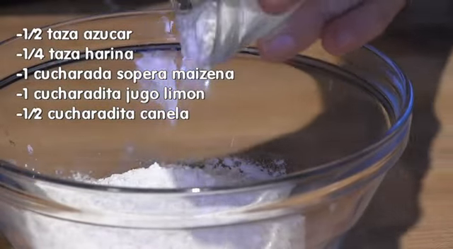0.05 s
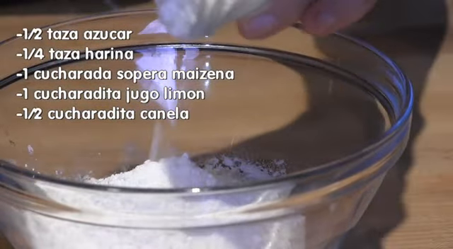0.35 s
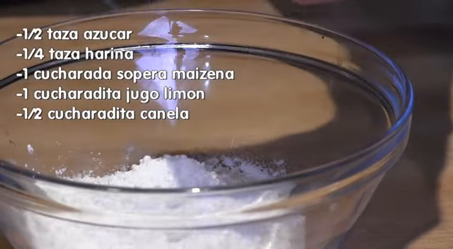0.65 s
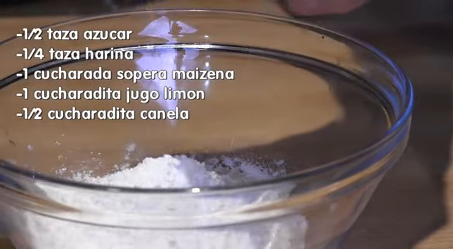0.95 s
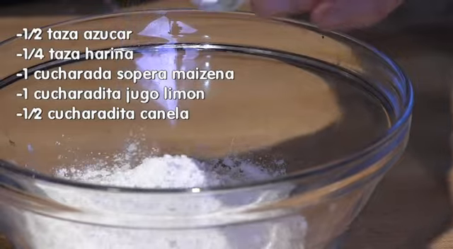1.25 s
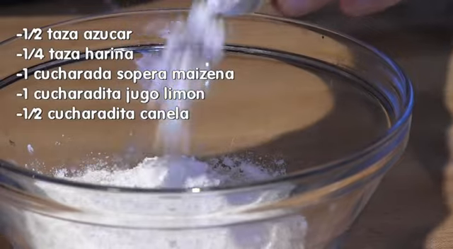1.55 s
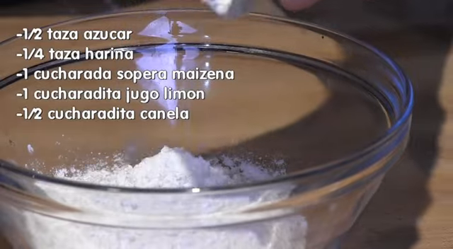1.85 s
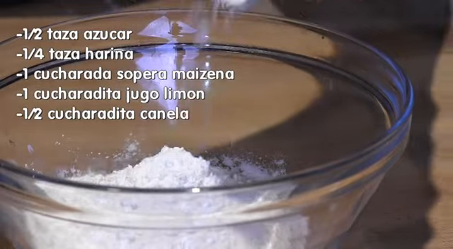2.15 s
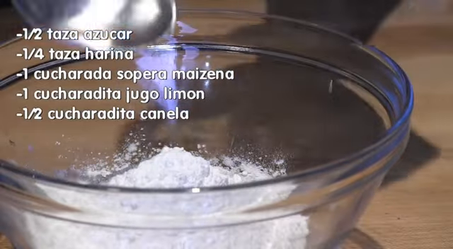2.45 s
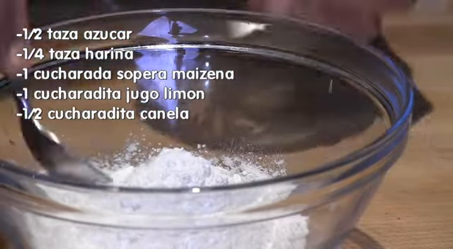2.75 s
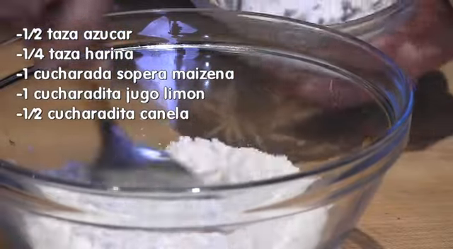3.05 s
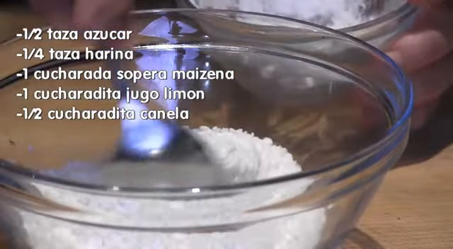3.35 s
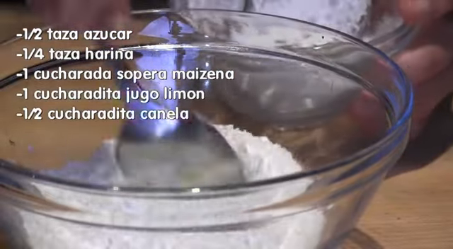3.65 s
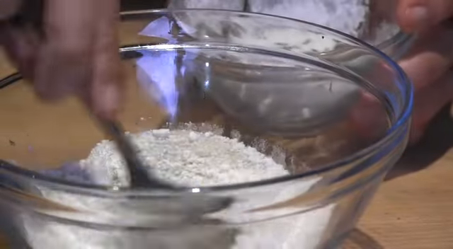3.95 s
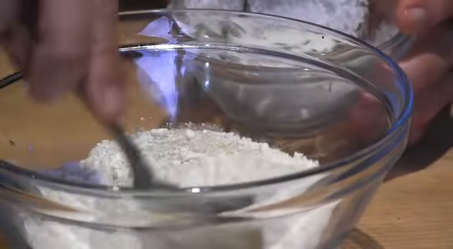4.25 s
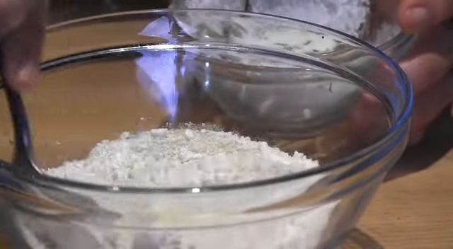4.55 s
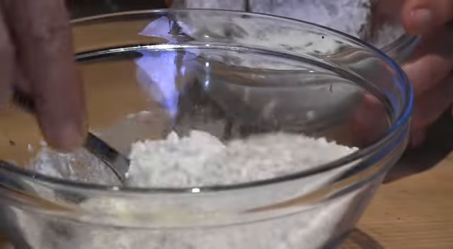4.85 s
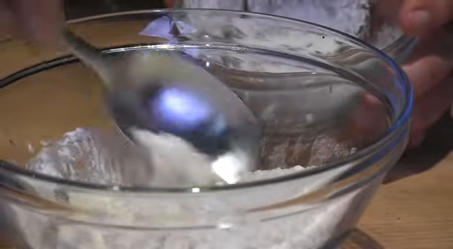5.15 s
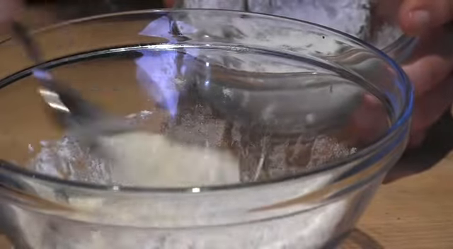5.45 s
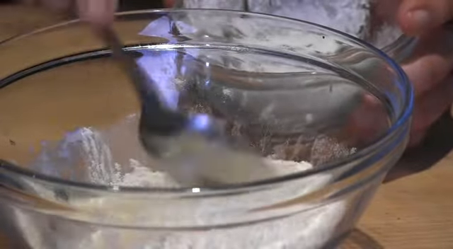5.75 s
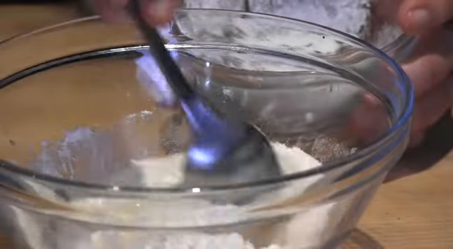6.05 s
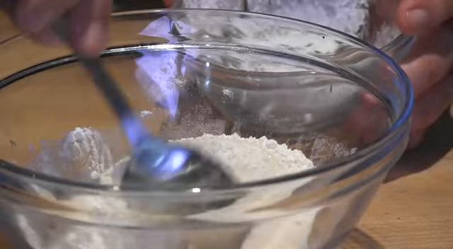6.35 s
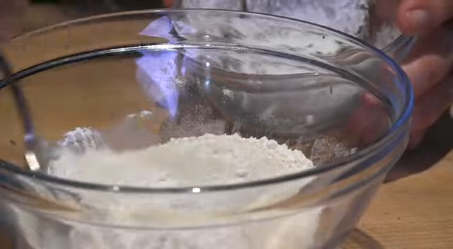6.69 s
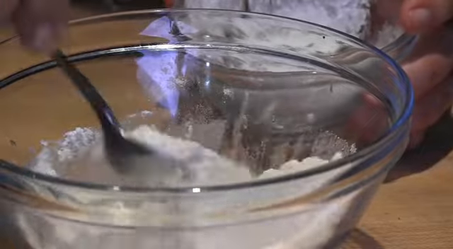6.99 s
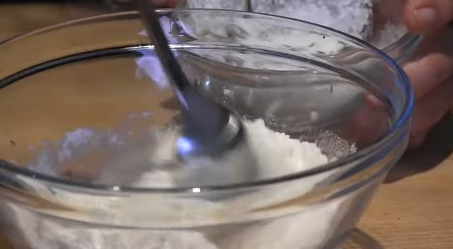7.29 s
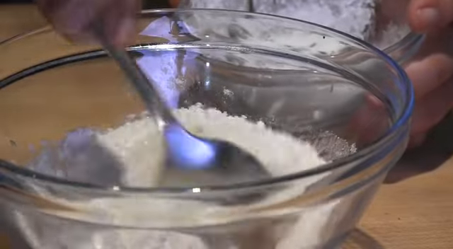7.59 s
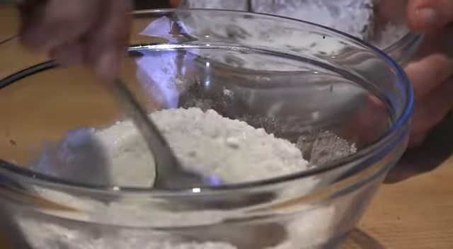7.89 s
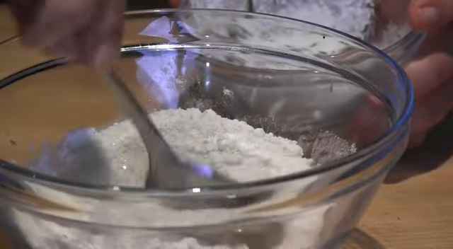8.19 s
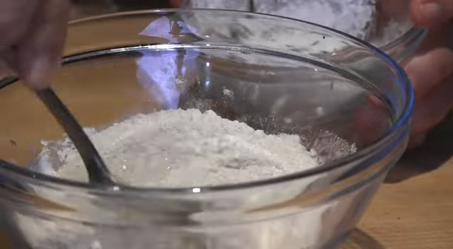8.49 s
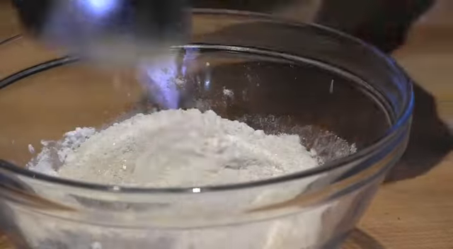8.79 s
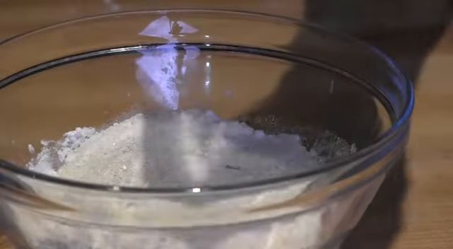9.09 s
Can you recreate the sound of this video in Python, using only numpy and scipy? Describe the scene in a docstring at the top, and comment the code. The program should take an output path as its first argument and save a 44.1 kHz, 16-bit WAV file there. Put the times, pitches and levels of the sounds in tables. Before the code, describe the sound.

Close to the microphone, a metal cup taps sharply on the rim of a glass bowl about four times a second, ringing more as it empties. A steel spoon then rasps softly through dry flour and sugar, with small ticks, damped knocks and three bright clinks on the glass. It ends with a brief rattle against the cup. A faint appliance hum fills the small kitchen.

```python
"""A metal cup taps on the rim of a glass bowl, close to the microphone, ringing more as the flour shakes out.
Then a steel spoon rasps through the dry mix, its tip catching and slipping on the grains. It knocks on the
covered glass, clinks three times on the bare wall, and rattles against the cup as it is laid aside.
Each blow is a short crack plus ringing modes. A small hard kitchen answers, with a faint appliance hum
behind it all, and the loud blows overload the microphone."""
import sys
import numpy as np
from scipy import signal
from scipy.fft import rfft, irfft
from scipy.io import wavfile

SR = 44100
rng = np.random.default_rng(int(sys.argv[2]) if len(sys.argv) > 2 else 0)


def transcribe(signal):
    """Save signal, clipped to [-1, 1], as a 16-bit WAV file at the path in sys.argv[1]."""
    frames = np.atleast_2d(signal).T
    limited = np.clip(frames, -1, 1)
    pcm = np.round(limited * 32767).astype(np.int16)
    wavfile.write(sys.argv[1], SR, pcm)


N = 411453

# Cup on the rim, with rebounds; spoon against the cup: (time [s], level [dB], favoured pitch [Hz])
RIM_TAPS = [(-.06, -2, 5450), (.1495, -12, 1660), (.2163, -22.5, 1330), (.4159, -9.5, 1320),
            (.658, -6, 1330), (.922, -7.5, 2040), (.9608, -14.5, 3960), (1.132, -10.5, 1510),
            (1.149, -23.5, 1320), (1.4093, -6, 1430), (1.659, -4.5, 1850), (1.9233, -5, 4040),
            (2.1652, -6.5, 7600)]
SPOON_RATTLE = [(9.208, -19, 1750), (9.2671, -17, 4900), (9.301, -23, 1330)]
# Ring of the cup: (frequency [Hz], energy share [dB], t60 [s])
CUP_MODES = [(1310, -10, .08), (1365, -14, .1), (1665, -13, .1), (1712, -9, .2), (3222, -10, .16),
             (3596, -6, .11), (3648, -1, .14), (4759, -16, .25), (6285, -9, .17), (6860, -10, .07),
             (7745, -14, .27), (7812, -14, .12), (1170, -15, .08), (2040, -14, .04), (4945, -12, .06),
             (6030, -15, .1), (9410, -10, .025), (12560, -14, .04)]
# Its crack of contact, a blur of short-lived modes: (frequency [Hz], relative density [dB])
CUP_CRACK_SPECTRUM = [(60, -23.5), (650, -6.5), (1300, 5.5), (2500, 3), (3500, 1.5), (4900, 4), (7200, -1),
                      (7900, 0), (9500, 0.5), (10300, -15.5), (11800, -13), (12600, -4), (14200, -13.5),
                      (15500, -9.5)]

def metal_cup(room, full_ring_db=-12, empty_ring_db=-1.5, empty_s=1.8):
    """Flour damps the cup, so it rings more freely as it empties; at the end the spoon rattles on it."""
    emptied = np.clip(np.transpose(RIM_TAPS)[0] / empty_s, 0, 1) ** 2
    ring_db = full_ring_db + (empty_ring_db - full_ring_db) * emptied
    taps = struck(RIM_TAPS, ring_db, tilt_db=-0.55, hardening=0.19)
    rattle = struck(SPOON_RATTLE, ring_db=-9, tilt_db=-1.6, hardening=0.27)
    return blows(np.vstack([taps, rattle]), CUP_MODES, CUP_CRACK_SPECTRUM, room,
                 crack_t60=0.028, modes_db=0.5, favour_db=10.5, favour_octaves=0.16)


# Spoon on covered glass: (time [s], level [dB], brightness [dB/octave])
COVERED_KNOCKS = [(4.0057, -13.5, -1), (4.290, -14, -0.35), (5.683, -20.5, -2.3), (6.3833, -13, -1.6),
                  (7.6124, -7.5, -0.6), (7.9549, -28, -4.5), (8.5214, -11, 0.5)]
# Ring of the spoon: (frequency [Hz], energy share [dB], t60 [s])
SPOON_MODES = [(534, -16.5, 0.076), (677, -12, 0.057), (981, -17.5, 0.31), (1137, -8.5, 0.024),
               (1927, -10.5, 0.036), (2130, -25, 0.027), (2290, -35, 0.014), (3180, -21, 0.28),
               (3380, -9, 0.014), (4700, -17.5, 0.21), (4870, -36, 0.13), (7520, -13.5, 0.024),
               (8050, -21, 0.032), (9340, -12, 0.02), (9790, -19, 0.043), (10860, -11.5, 0.036)]
# Its crack of contact: (frequency [Hz], relative density [dB])
SPOON_CRACK_SPECTRUM = [(60, -31), (380, -6), (1000, -1.5), (1500, -3.5), (2100, -1), (2900, -6),
                        (3400, -5.5), (4900, 1.5), (6900, -15.5), (8000, -5.5), (9400, -5), (10200, -21),
                        (13700, -12), (14400, -20)]

def spoon_knocks(room, ring_db=-5, favoured_hz=1900):
    """Steel meets glass through a layer of powder, which damps every knock alike."""
    knocks = [(s, db, tilt_db, ring_db, favoured_hz) for s, db, tilt_db in COVERED_KNOCKS]
    return blows(knocks, SPOON_MODES, SPOON_CRACK_SPECTRUM, room,
                 crack_t60=0.03, modes_db=5.5, favour_db=-0.3, favour_octaves=0.12)


# Spoon on bare glass: (time [s], level [dB], brightness [dB/octave], ring [dB], favoured pitch [Hz])
WALL_CLINKS = [(5.2228, -5.5, 0.9, -9.5, 9300), (5.6086, -16, -1.85, 11, 4330),
               (6.0027, -14, 0, -2.5, 3030)]
# Ring of the bowl: (frequency [Hz], energy share [dB], t60 [s])
BOWL_MODES = [(1631, -2, .34), (2948, -5, .42), (4589, 0, .3), (6546, -9, .22), (8755, -5, .18),
              (10275, -11, .15), (6000, -11, .03), (9070, -13, .13), (12110, -17, .12)]
# Its crack of contact: (frequency [Hz], relative density [dB])
BOWL_CRACK_SPECTRUM = [(60, -10.5), (590, -1), (690, 11.5), (800, -3), (1900, 0), (2400, 3), (4500, -3),
                       (6300, 5), (7900, -4), (8700, 1), (10400, 5), (11300, -5), (16000, -8)]

def bowl_clinks(room):
    """The spoon strikes the bare wall and sets the glass ringing."""
    return blows(WALL_CLINKS, BOWL_MODES, BOWL_CRACK_SPECTRUM, room,
                 crack_t60=0.044, modes_db=-4, favour_db=10, favour_octaves=0.33)


# Slips of the spoon's tip: (time [s], level [dB], favoured pitch [Hz])
TIP_SLIPS = [(2.9767, -25, 9700), (3.2541, -36, 9700), (3.3195, -40, 9700), (3.539, -40, 4950),
             (3.6553, -37.5, 11350), (4.6823, -38, 8450), (4.703, -33.5, 5000), (4.7846, -31.5, 2280),
             (6.596, -37, 5030), (6.6593, -29, 5100), (6.7282, -36.5, 5200), (6.826, -31, 1320)]
# Ring of the tip: (frequency [Hz], energy share [dB], t60 [s])
TIP_MODES = [(1307, -6, 0.046), (2230, -8.5, 0.055), (3384, -9.5, 0.028), (4860, -12, 0.026),
             (4960, -18.5, 0.16), (6130, -12, 0.028), (7980, -15.5, .015), (8200, -13, 0.033),
             (9740, -12.5, .04), (11230, -18, 0.16), (12200, -19, .008)]
# Rasp of grains under the tip: (frequency [Hz], relative density [dB])
RASP_SPECTRUM = [(200, -2), (800, 10.5), (5000, -0.5), (7000, -8.5), (9000, 0), (10400, -10), (13300, -7),
                 (14500, -14)]

def tip_slips(room):
    """The tip catches and slips with a small ringing tick."""
    slips = struck(TIP_SLIPS, ring_db=2, tilt_db=-0.04, hardening=0)
    return blows(slips, TIP_MODES, RASP_SPECTRUM, room,
                 crack_t60=0.045, modes_db=0.5, favour_db=6.5, favour_octaves=0.21)


# Sweeps of the spoon through the powder: (middle time [s], relative level [dB], half length [s])
SPOON_SWEEPS = [(3.62, -43, 0.047), (6.78, -40, 0.052), (7.27, -47.5, .06), (8.06, -45.5, 0.21),
                (8.253, -36.5, 0.023)]

def spoon_pressure(t, grind_lead_s=0.0045, grind_half_s=0.021, grind_db=-12.5):
    """Force of the spoon on the powder: long sweeps, and a short grind leading into each slip."""
    grinds = [(s - grind_lead_s, db + grind_db, grind_half_s) for s, db, _ in TIP_SLIPS]
    swells = SPOON_SWEEPS + grinds
    return np.sqrt(sum(amp(db) ** 2 * np.exp(-((t - s) / half) ** 2) for s, db, half in swells))


def stirring(room, grains_per_s=600, grain_spread_db=4.5, hiss_db=-6, ring_db=-4):
    """Sugar grains are crushed between steel and glass; each one rings the tip of the spoon."""
    t = np.arange(N) / SR
    sizes = amp(grain_spread_db * np.minimum(rng.exponential(1, N), 4)) * rng.choice([-1, 1], N)
    grains = sizes * (rng.random(N) < grains_per_s / SR)
    age = t[:SR // 4]
    tip = sum(amp(db) * unit(np.cos(2 * np.pi * hz * age) * amp(-60 * age / t60))
              for hz, db, t60 in TIP_MODES)
    hiss = amp(hiss_db) * unit(colour(grains, RASP_SPECTRUM))
    ring = amp(ring_db) * unit(signal.oaconvolve(grains, tip)[:N])
    return at_microphone(spoon_pressure(t) * (hiss + ring), room)


def struck(rows, ring_db, tilt_db, hardening):
    """A harder blow is a shorter contact, so brighter: hardening is dB/octave per dB over the mean."""
    s, db, favoured_hz = np.transpose(rows)
    brightness = tilt_db + hardening * (db - db.mean())
    return np.column_stack([s, db, brightness, ring_db + np.zeros(len(s)), favoured_hz])


def blows(rows, modes, spectrum, room, crack_t60, modes_db, favour_db, favour_octaves, spread_db=1):
    """Each blow is a short crack plus ringing modes, as mid and side."""
    t = np.arange(SR * 3 // 4) / SR
    hz, mode_db, _ = np.transpose(modes)
    octaves = np.log2(hz / 3000)
    waves = ringing(modes, room, t)
    cracks, rings = np.zeros(N), np.zeros((2, N))
    norm = np.sqrt(.01 * SR / len(t))  # levels count the energy as if it came within 10 ms
    for s, db, tilt_db, ring_db, favoured_hz in rows:
        burst = rng.standard_normal(len(t)) * amp(-60 * t / crack_t60)
        add(cracks, s, norm * amp(db) * unit(colour(burst, spectrum, tilt_db)))
        # modes that move most at the point of contact take most of the blow
        favour = favour_db * np.exp(-(np.log2(hz / favoured_hz) / favour_octaves) ** 2)
        shares = amp(mode_db + favour + tilt_db * octaves + spread_db * rng.standard_normal(len(hz)))
        phases = np.exp(2j * np.pi * rng.random(len(hz)))
        ring = np.tensordot(shares * phases, waves, 1).real
        for track, sound in zip(rings, ring):
            add(track, s, norm * amp(db + ring_db + modes_db) * sound)
    return at_microphone(cracks, room) + rings


def ringing(modes, room, t, side_db=-1):
    """Each mode beats with its own reflections: complex waves, modes x (mid, side) x time."""
    hz, _, t60 = np.transpose(modes)
    waves = np.exp(np.outer(2j * np.pi * hz - np.log(1000) / t60, t))
    waves = signal.fftconvolve(waves[:, None], room[None], axes=2)[..., :len(t)]
    waves /= waves.real.std(2, keepdims=True)
    waves[:, 1] *= amp(read(ROOM_WIDTH, hz) + side_db)[:, None]
    return waves


# Decay of the kitchen: (frequency [Hz], t60 [s])
ROOM_DECAY = [(150, .22), (500, .33), (1000, .38), (4000, .4), (8000, .35), (15000, .25)]
# Width of its reflections at the microphone: (frequency [Hz], side against mid [dB])
ROOM_WIDTH = [(200, -2.5), (1000, -2.5), (2500, -5.5), (5000, -8), (8000, -2), (13000, -15.5)]

def kitchen(wet_db=-1, early_db=4, early_t60=0.095, gap_s=0.00092):
    """Mid and side response near the bowl: direct sound, quick table and wall echoes, a short tail."""
    hz, t, noise = signal.stft(rng.standard_normal((2, SR * 3 // 4)), SR, nperseg=256)
    diffuse = amp(-60 * t / read(ROOM_DECAY, hz)[:, None])
    early = amp(early_db - 60 * t / early_t60)
    reflections = noise * (diffuse + early)
    reflections[1] *= amp(read(ROOM_WIDTH, hz))[:, None]
    tail = signal.istft(reflections, SR, nperseg=256)[1]
    tail *= 1 - np.exp(-(np.arange(tail.shape[1]) / SR / gap_s) ** 2)
    response = amp(wet_db) * tail / np.linalg.norm(tail[0])
    response[0, 0] += 1  # direct sound, dead centre
    return response


def at_microphone(x, room):
    """A dry sound as it reaches the close microphone, as mid and side."""
    return signal.oaconvolve(x[None], room, axes=1)[:, :N]


# Still air of the kitchen: (frequency [Hz], relative density [dB])
AIR_SPECTRUM = [(25, -7.5), (200, -7), (500, -7), (850, -4.5), (1300, -9), (1900, -11.5), (5400, -20.5),
                (8000, -26.5), (10500, -28.5), (12500, -25.5), (15500, -29)]
# Its width: (frequency [Hz], side against mid [dB])
AIR_WIDTH = [(60, 17), (130, 16), (290, 14), (640, 3.5), (1410, -3), (3100, -5), (6820, -3), (15000, -14.5)]
# Appliance hum and fan tones: (frequency [Hz], bandwidth [Hz], level [dB])
APPLIANCE_TONES = [(113, 1, -74.5), (240.2, 4.6, -52), (830, 3.4, -51.5), (954, 21, -60), (1885, 170, -54)]

def room_tone(air_db=-43, hum_side_db=-3):
    """Steady air, very wide in the bass, with the wavering tones of an appliance; left and right."""
    f = np.fft.rfftfreq(N, 1 / SR)
    air_gain = amp(read(AIR_SPECTRUM, f))
    air = np.array([shaped_noise(air_gain), shaped_noise(air_gain * amp(read(AIR_WIDTH, f)))])
    air *= amp(air_db) / air[0].std()
    hum_gain = sum(amp(db) * np.sqrt(SR / 2 / width) / (1 + (2 * (f - hz) / width) ** 2)
                   for hz, width, db in APPLIANCE_TONES)
    hum = np.array([shaped_noise(hum_gain), amp(hum_side_db) * shaped_noise(hum_gain)])
    mid, side = air + hum
    return np.array([mid + side, mid - side])


def amp(db):
    """Decibels to gain."""
    return 10 ** (np.asarray(db) / 20)


def unit(x):
    """Scales to an rms of 1."""
    return x / np.sqrt(np.mean(x ** 2) + 1e-20)


def read(points, hz):
    """Reads a table along a logarithmic frequency axis."""
    f, value = np.transpose(points)
    return np.interp(np.log(hz + 1), np.log(f + 1), value)


def add(mix, s, sound):
    """Adds a sound at time s, dropping what lies outside."""
    at = round(s * SR)
    sound = sound[max(-at, 0):]
    part = mix[max(at, 0):][:len(sound)]
    part += sound[:len(part)]


def shaped_noise(gain):
    """White noise weighted by a gain for each frequency."""
    return irfft(rfft(rng.standard_normal(N)) * gain, N)


def colour(x, points, tilt_db=0, size=2048):
    """Causal filter, so that attacks stay sharp; the tilt, in dB/octave, pivots at 3 kHz."""
    hz = abs(np.fft.fftfreq(size, 1 / SR))
    octaves = np.log2(np.maximum(hz, 300) / 3000)
    log_gain = np.log(amp(read(points, hz) + tilt_db * octaves))
    taps = np.fft.ifft(np.exp(np.conj(signal.hilbert(log_gain)))).real
    return signal.oaconvolve(x, taps[:size // 2])[:len(x)]


def scene():
    """Cup, spoon and bowl close up, the kitchen behind them, in stereo."""
    room = kitchen()
    mid, side = metal_cup(room) + spoon_knocks(room) + tip_slips(room) + bowl_clinks(room) + stirring(room)
    return np.array([mid + side, mid - side]) + room_tone()


def record(dry):
    """The loudest blows overload the close microphone and clip flat; the band ends at 15.8 kHz."""
    clipped = np.clip(dry, -1, 1)
    lowpass = signal.firwin(511, 15800, window=("kaiser", 9), fs=SR)
    return signal.oaconvolve(clipped, lowpass[None], "same")


dry = scene()
out = record(dry)
transcribe(out)
```